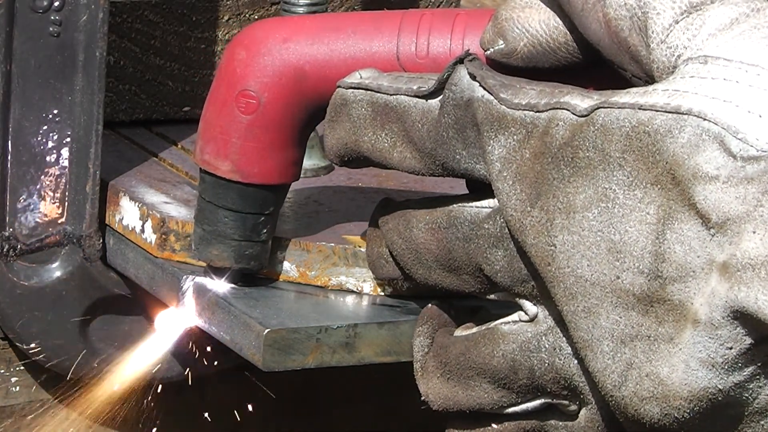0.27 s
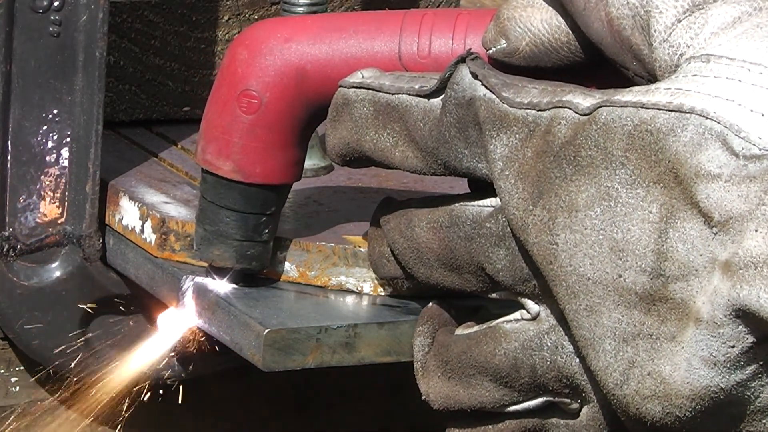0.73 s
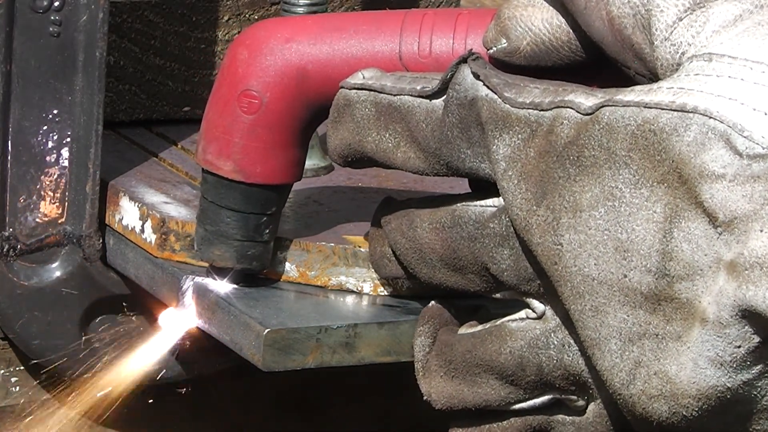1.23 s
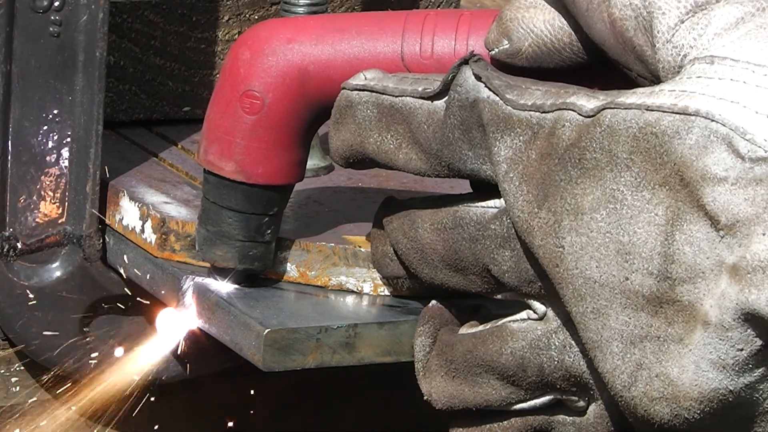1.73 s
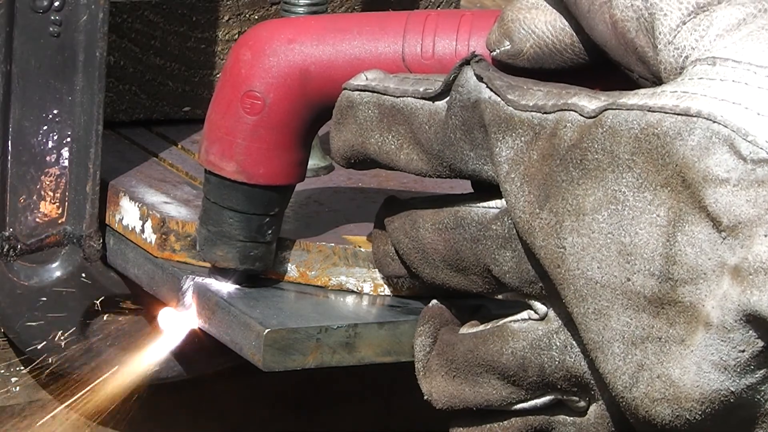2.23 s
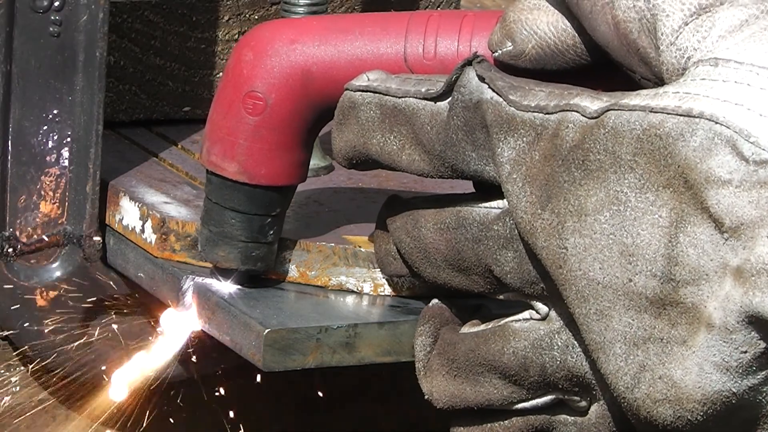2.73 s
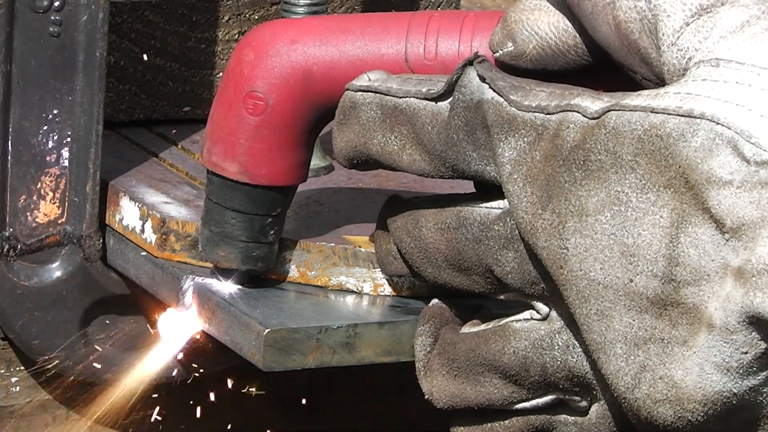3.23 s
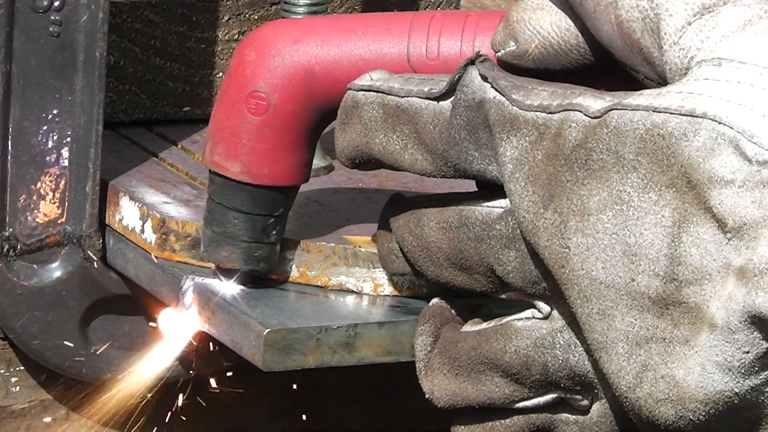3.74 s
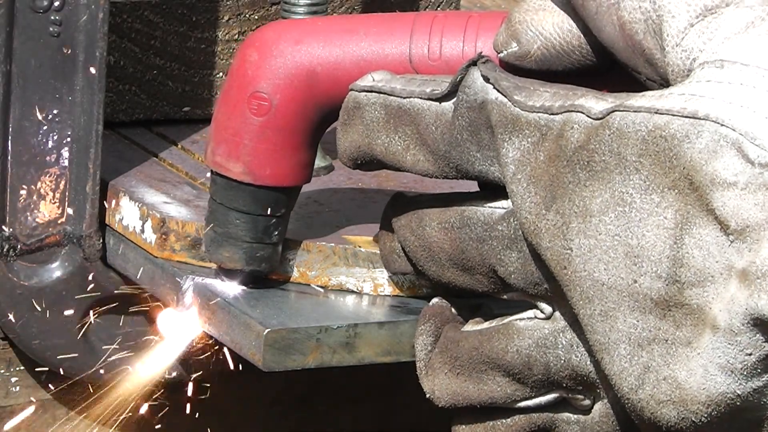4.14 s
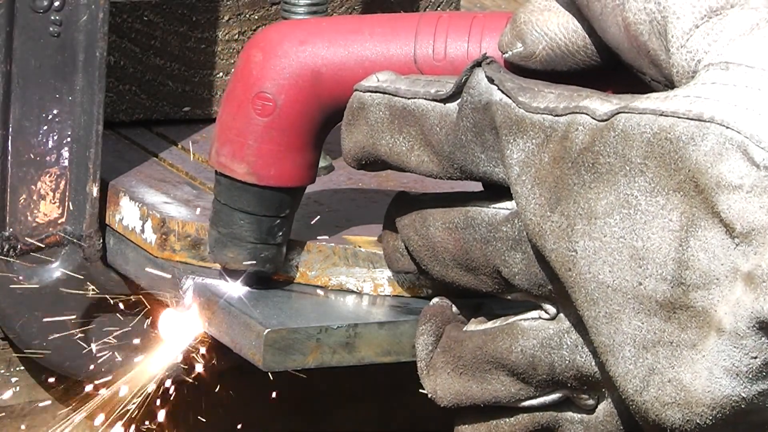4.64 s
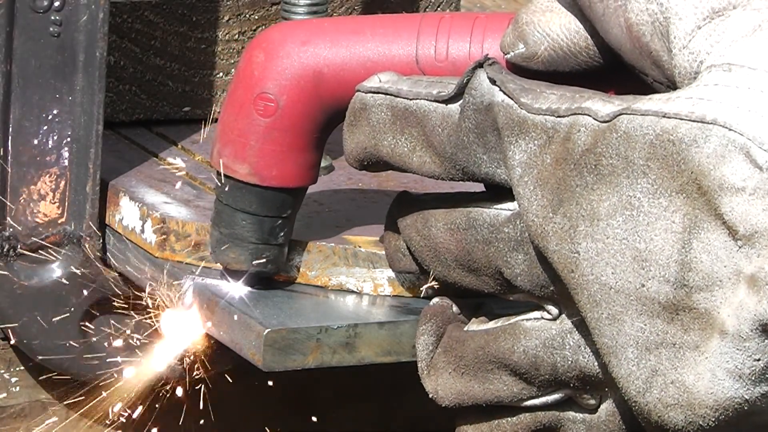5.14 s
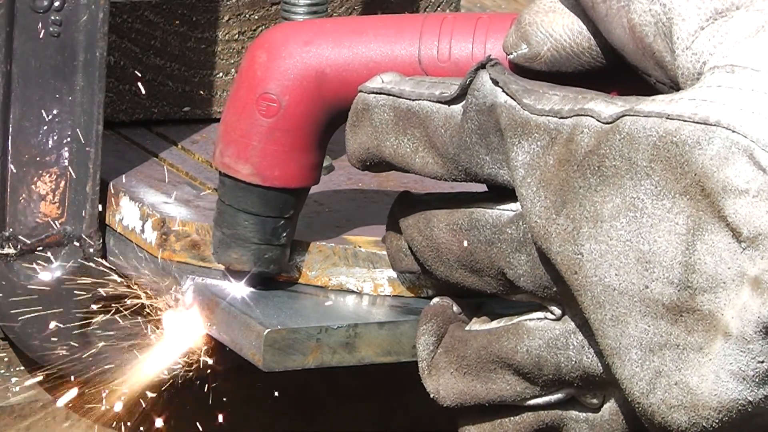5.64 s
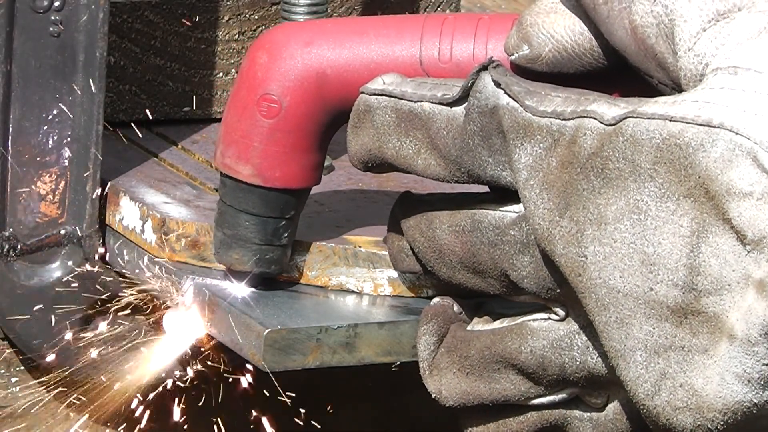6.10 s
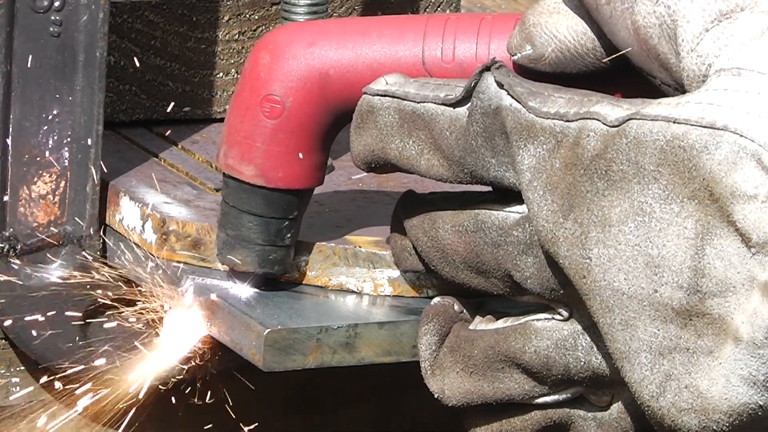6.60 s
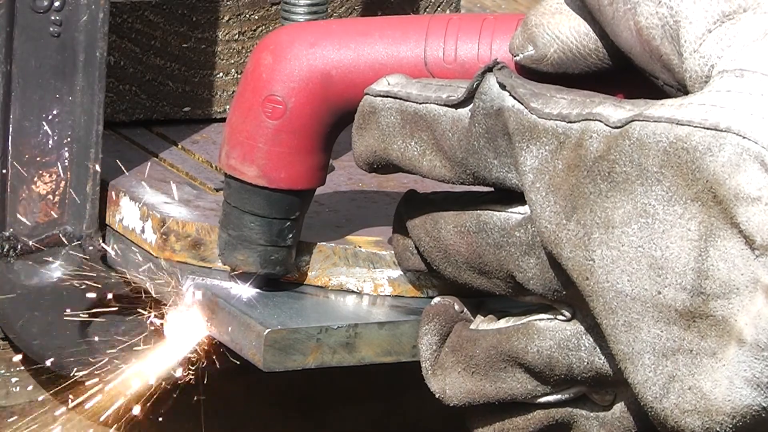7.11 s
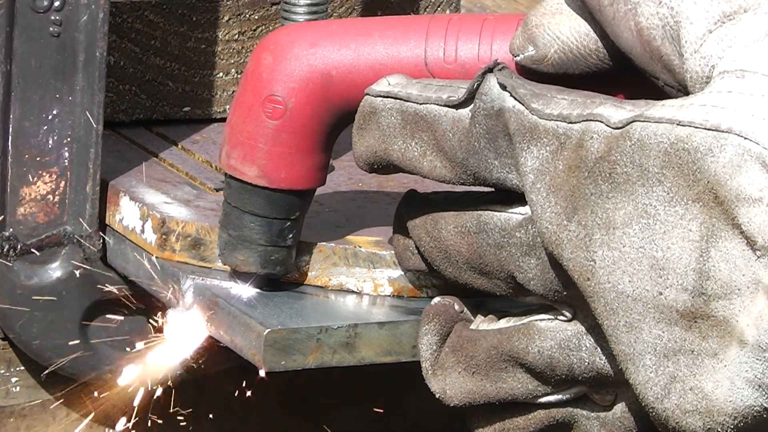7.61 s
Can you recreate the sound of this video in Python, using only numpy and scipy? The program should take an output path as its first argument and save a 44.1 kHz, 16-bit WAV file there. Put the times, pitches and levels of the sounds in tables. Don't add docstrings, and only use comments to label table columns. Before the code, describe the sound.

A plasma torch cuts thick steel plate up close, a loud, harsh, continuous treble hiss that flutters, with faint low crackle and scattered small pops.

```python
import sys
import numpy as np
from scipy import signal
from scipy.fft import rfft, irfft
from scipy.io import wavfile
from scipy.ndimage import uniform_filter1d

SR = 44100
rng = np.random.default_rng(int(sys.argv[2]) if len(sys.argv) > 2 else 0)


def log_audio(samples):
    frames = np.atleast_2d(samples).T
    limited = np.clip(frames, -1, 1)
    pcm = np.round(limited * 32767).astype(np.int16)
    wavfile.write(sys.argv[1], SR, pcm)


def level_to_linear(level):
    exponent = np.asarray(level, float) / 20
    return 10 ** exponent


N = 346626


def evened(x):
    return x / np.sqrt(np.mean(x ** 2) + 1e-20)


def read(points, hz, axis=1):
    columns = np.transpose(points)
    return np.interp(np.log(hz + 1), np.log(columns[0] + 1), columns[axis])


def bump(hz, centre_hz, width_hz):
    return 1 / (1 + (2 * (hz - centre_hz) / width_hz) ** 2)


def above(hz, corner_hz, order):
    return 1 / (1 + (corner_hz / (hz + 1)) ** order)


def below(hz, corner_hz, order):
    return 1 / (1 + (hz / corner_hz) ** order)


def flutter(slow_hz, fast_hz, count):
    hz = np.fft.rfftfreq(N, 1 / SR)
    shape = (count, len(hz))
    z = rng.standard_normal(shape) + 1j * rng.standard_normal(shape)
    z = z / (1 + (slow_hz / (hz + 1e-3)) ** 4)
    z = z / np.sqrt(1 + (hz / fast_hz) ** 2)
    return evened(irfft(z / np.sqrt(hz + 1), N))


def blotches(frames, size):
    z = rng.standard_normal((1025, frames))
    for axis in (0, 1, 0, 1):
        z = uniform_filter1d(z, size[axis], axis=axis, mode="wrap")
    return evened(z)


# (time [s], jet strength [dB], spread of low and top hiss against the body [dB])
JET_WORK = [(0, -23.5, 0.5), (.5, -21.5, -1), (.9, -22, 0.5), (1.3, -21.5, -1), (1.75, -21.5, -0.5),
            (2.1, -22.5, 0), (2.45, -21, -1), (2.8, -22.5, 0), (3.3, -21.5, -0.5), (3.9, -22, 0.56),
            (4.35, -21.5, 0), (4.85, -22.5, 0.5), (5.4, -22, 0.4), (5.95, -22, -0.1), (6.45, -22, -0.6),
            (6.9, -21, -0.4), (7.1, -21.5, 0), (7.86, -22, 0)]
# (time [s], strength [dB], length [s])
JET_SPURTS = [(.11, -0.3, 0.055), (0.226, 1.4, 0.1), (0.422, -1.5, .08), (0.516, 1, .07),
              (0.762, 0.5, 0.06), (0.99, -1, 0.049), (1.46, 0.6, .06), (1.51, -0.5, .06), (1.655, -1, .07),
              (1.787, 1, .09), (1.874, -1, 0.055), (1.98, 0.5, .06), (2.113, -0.5, .09), (3.604, -1, 0.077),
              (3.93, 0.2, 0.056), (4.42, 1.15, 0.14), (4.65, -1.5, 0.056), (4.717, 1.5, 0.071),
              (5.01, 0.5, .06), (5.067, -1.5, 0.051), (5.313, -0.7, 0.054), (5.53, 1, 0.039),
              (5.65, -2, 0.063), (5.718, 0.6, 0.053), (5.896, -1.5, 0.031), (6.17, -1.8, 0.044),
              (6.55, 0.6, 0.051), (7.035, -1.3, 0.052), (7.525, 0.8, 0.076), (7.812, -1.5, 0.096)]


def strength(t):
    s, slow_db, _ = np.transpose(JET_WORK)
    spurt_db = sum(db * np.exp(-(2 * (t - at) / length) ** 2) for at, db, length in JET_SPURTS)
    return np.interp(t, s, slow_db), spurt_db


# (frequency [Hz], level [dB])
CRACKLE_BAND = [(20, -2.5), (60, -2.5), (200, -2.5), (500, -1), (1200, -1), (1800, -6), (2300, -9),
                (3000, -74)]


def crackle_band():
    return level_to_linear(read(CRACKLE_BAND, np.fft.rfftfreq(N, 1 / SR)))


# (time [s], peak [dB], left minus right [dB])
OVERLOAD_POPS = [(0.214, -27, 4), (0.269, -28.5, -5), (0.568, -28, -5), (0.611, -27, -9), (0.766, -27, -7),
                 (0.952, -26, -8), (1.013, -29, -4), (1.995, -23, -15), (2.271, -30, 1), (2.865, -29, -7),
                 (3.239, -27, 0), (3.716, -24, -12), (3.812, -28, -7), (3.928, -27, 6), (4.222, -26, -7),
                 (4.286, -29, 2), (4.349, -24, -15), (4.427, -28, 3), (4.486, -29, 5), (4.705, -29, 7),
                 (4.834, -28, -6), (5.014, -26, -7), (5.54, -24, -8), (5.845, -31, 0), (5.975, -29, -4),
                 (6.285, -25, -15), (6.549, -28, -3), (7.098, -28, -2), (7.572, -30, -1), (7.751, -27, 1)]


def pops():
    pop_gain_db = 0.3
    clicks = np.zeros((2, N))
    signs = rng.choice([-1., 1.], len(OVERLOAD_POPS))
    for (s, db, pan_db), sign in zip(OVERLOAD_POPS, signs):
        quieter_db = np.maximum([-pan_db, pan_db], 0)
        clicks[:, round(s * SR)] += sign * level_to_linear(db + pop_gain_db - quieter_db)
    band = crackle_band()
    return irfft(rfft(clicks) * band / band.mean(), N)


def overload(x):
    crackle_db, per_slow_db, per_spurt_db, wander_db = -42.5, 1.06, 3, 0.57
    bass_hz, bass_per_crackle_db = 423, 0.36
    knee = level_to_linear(-9.7)
    cut = evened(x - np.clip(x, -knee, knee))
    bent = evened(x ** 2 - np.mean(x ** 2))
    band = crackle_band()
    low = evened(irfft(rfft(cut) * band, N))
    low = low + 0.068 * evened(irfft(rfft(bent[::-1]) * band, N))
    low = low - .09 * low[::-1]
    power = (low ** 2).mean(0)
    for _ in range(2):
        power = uniform_filter1d(power, size=3000)
    low = low / np.sqrt(power + 0.058)

    slow_db, spurt_db = strength(np.arange(N) / SR)
    level_db = crackle_db + per_slow_db * (slow_db - slow_db.mean()) + per_spurt_db * spurt_db
    level_db += wander_db * flutter(slow_hz=3.4, fast_hz=30, count=1)[0]

    bass = signal.oaconvolve(low, signal.firwin(1001, bass_hz, fs=SR)[None], "same")
    swing_db = bass_per_crackle_db * (level_db - level_db.mean())
    swing_db += 1.4 * flutter(slow_hz=4, fast_hz=25, count=1)[0]
    low = low + bass * (level_to_linear(swing_db - 0.4) - 1)
    return low * level_to_linear(level_db + np.array([[-.2], [.2]]))


# (frequency [Hz], start level [dB], change once the torch has moved [dB])
HISS_COLOUR = [(500, -30, 0), (1100, -21, 0), (1850, -18, .1), (2520, -34.5, -1), (3400, -24, -1.2),
               (4100, -13.3, -.7), (5500, -14.7, -.7), (6300, -9.5, 1.2), (8300, -6.2, -1.1),
               (9600, -2.7, 0), (11800, -3.6, 2.1), (13600, -7.9, -3.5), (14600, -7.2, 3.3),
               (15700, 0, -.3)]
# (frequency [Hz], width [Hz], start [dB], end [dB])
RESONANCES = [(997, 60, -2.9, -3.1), (1477, 60, -3.8, -4.2), (1857, 60, -2.2, -2.4), (2377, 160, 3.2, 4.5),
              (2637, 60, 2.5, 3.5), (2807, 60, 2.8, 4.5), (3027, 60, 4.5, 4.9), (3237, 60, 9.4, 7.4),
              (3277, 100, -5.5, -2.1), (3407, 60, 2.0, 5.6), (3457, 60, -5.2, -6.7), (3837, 60, 2.0, 2.9),
              (4787, 100, 3.4, 2.7), (5607, 60, -7.1, -1.7), (5827, 60, 5.9, 7.0), (5907, 60, -4.6, -0.6),
              (6507, 160, 2.9, 4.6), (6897, 60, -4.8, -0.8), (7027, 60, 7.1, 3.1), (7157, 250, 2.7, 5.6),
              (7197, 60, -7.7, -7.8), (7417, 60, -6.0, 1.0), (8967, 160, 3.4, 1.4), (9487, 60, 6.2, -0.6),
              (12027, 60, 4.2, -2.0), (12237, 100, 2.0, 3.9), (12537, 250, 4.1, 4.6),
              (12797, 250, 3.9, 3.6), (13147, 160, 3.8, 1.4), (13527, 250, 0.8, 5.9)]
# (time [s], share [0-1])
TORCH_TRAVEL = [
    (0, 0.04),
    (2, 0),
    (4, 0.27),
    (5.2, 0.8),
    (5.9, 0.97),
    (7.86, 0.9),
]
# (frequency [Hz], left-right likeness [0-1])
CAPSULE_LIKENESS = [(600, .9), (1800, .93), (2500, .95), (7000, .955), (9000, .955), (11000, .9),
                    (12500, .8), (13400, .45), (14100, .2), (14600, .8), (15200, .988)]
# (frequency [Hz], left minus right [dB])
CAPSULE_BALANCE = [(8800, 0), (9800, -2), (11000, -3.5), (11700, -6), (12400, -2), (13200, 4.5),
                   (14000, 1.5), (14500, 0)]
# (frequency [Hz], left lead [rad])
CAPSULE_LEAD = [(7500, 0), (9500, -.3), (11000, 0), (11600, .5), (12100, 1.4), (12900, 2.1), (13500, 3.3),
                (14100, 5.2), (14600, 6), (15200, 6.28)]


def jet():
    lower_spread, top_spread = 3.1, 1
    lower_wander_db, top_wander_db = 0.35, -0.28
    hop, frames = 512, N // 512 + 5
    f = np.fft.rfftfreq(2048, 1 / SR)[:, None]
    t = np.arange(frames) * hop / SR
    s, _, spread_db = np.transpose(JET_WORK)
    spread_db = np.interp(t, s, spread_db)
    travel = np.interp(t, *np.transpose(TORCH_TRAVEL))

    field_db = read(HISS_COLOUR, f) + travel * read(HISS_COLOUR, f, axis=2)
    for centre_hz, width_hz, start_db, end_db in RESONANCES:
        field_db += (start_db + travel * (end_db - start_db)) * bump(f, centre_hz, width_hz)
    field_db += .5 * blotches(frames, size=(40, 3))
    field_db += 1.68 * blotches(frames, size=(3, 120)) * above(f, 3900, 12)

    wander = flutter(slow_hz=2.3, fast_hz=12, count=2)[:, np.minimum(np.arange(frames) * hop, N - 1)]
    lower_db = lower_spread * spread_db + lower_wander_db * wander[0]
    top_db = top_spread * spread_db + top_wander_db * wander[1]
    field_db += lower_db * below(f, 8000, 12) * above(f, 3700, 6)
    field_db += top_db * above(f, 13000, 30)

    apart_db = read(CAPSULE_BALANCE, f) + 1.5 * blotches(frames, size=(3, 120)) * above(f, 11000, 12)
    same = np.clip(read(CAPSULE_LIKENESS, f), -1, 1)
    a, b, c, d = rng.standard_normal((4, 1025, frames))
    left, other = a + 1j * b, c + 1j * d
    right = same * left + np.sqrt(1 - same ** 2) * other
    right = right * np.exp(-1j * read(CAPSULE_LEAD, f))
    z = np.array([left * level_to_linear(apart_db / 2), right * level_to_linear(-apart_db / 2)]) * level_to_linear(field_db)
    hiss = evened(signal.istft(z, nperseg=2048, noverlap=1536)[1][:, :N])

    body_db, top_gust_db = flutter(slow_hz=11.3, fast_hz=71.5, count=2)
    top = signal.oaconvolve(hiss, signal.firwin(101, 12500, pass_zero=False, fs=SR)[None], "same")
    hiss = hiss + top * (level_to_linear(0.63 * top_gust_db) - 1)
    hiss = hiss * level_to_linear(.35 * flutter(slow_hz=5.6, fast_hz=12, count=1))
    slow_db, spurt_db = strength(np.arange(N) / SR)
    return hiss * level_to_linear(slow_db + spurt_db + 5.0 + 0.27 * body_db)


def scene():
    return jet()


def low_pass(x):
    return signal.sosfilt(signal.butter(12, 15750, fs=SR, output="sos"), x)


def record(dry):
    ceiling = .4
    return low_pass(np.clip(dry, -ceiling, ceiling) + overload(dry) + pops())


dry = scene()
out = record(dry)
log_audio(out)
```